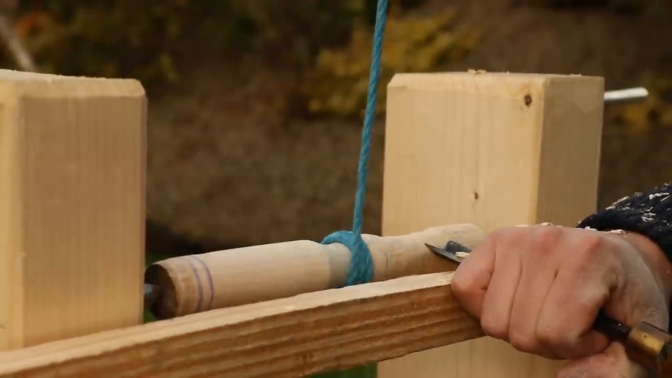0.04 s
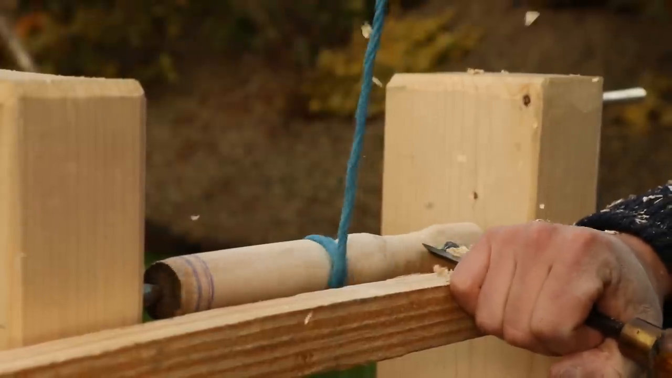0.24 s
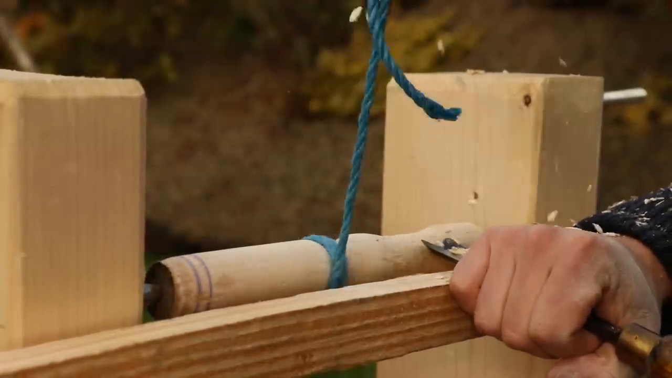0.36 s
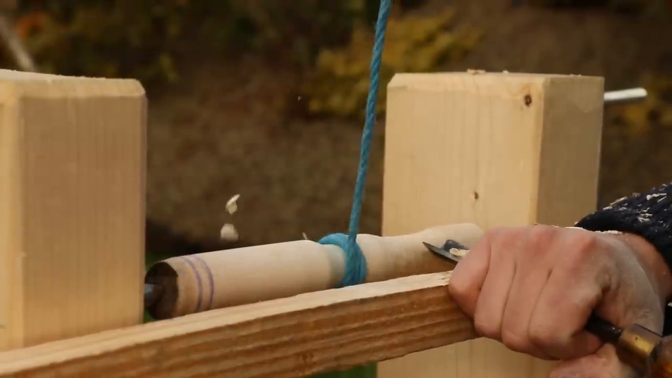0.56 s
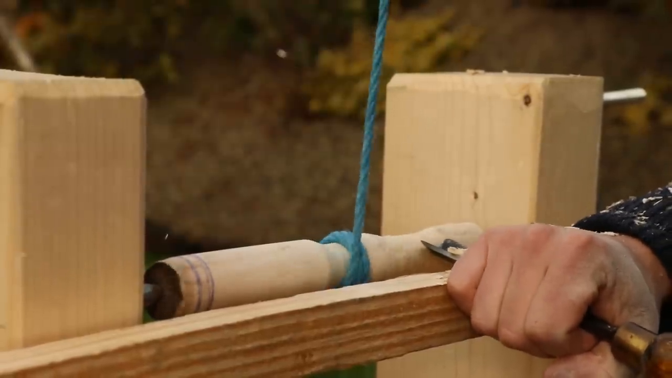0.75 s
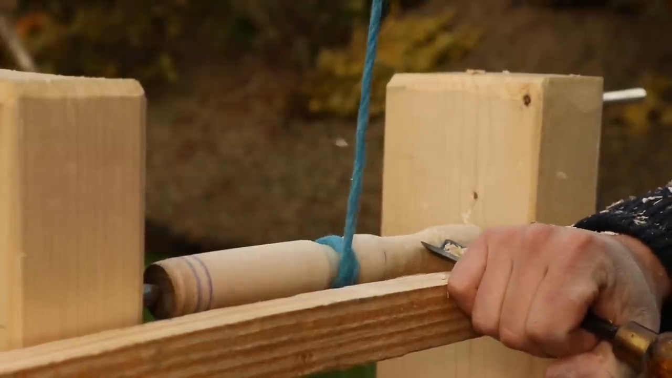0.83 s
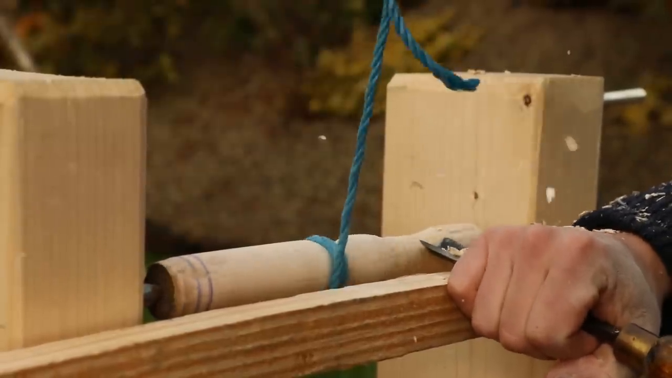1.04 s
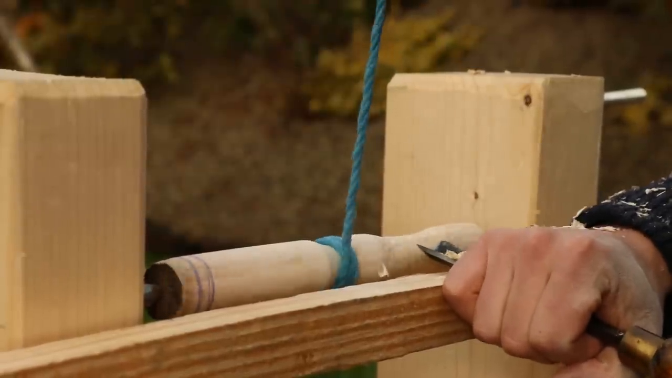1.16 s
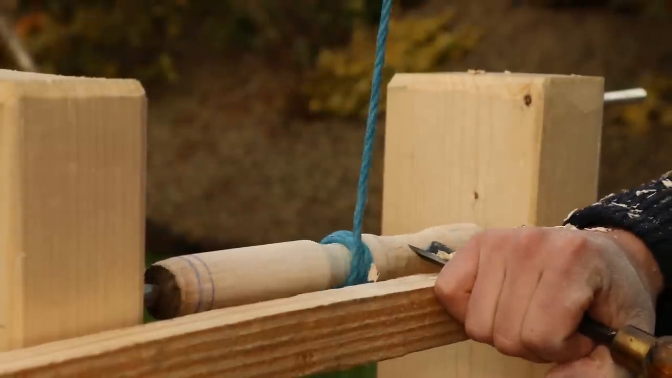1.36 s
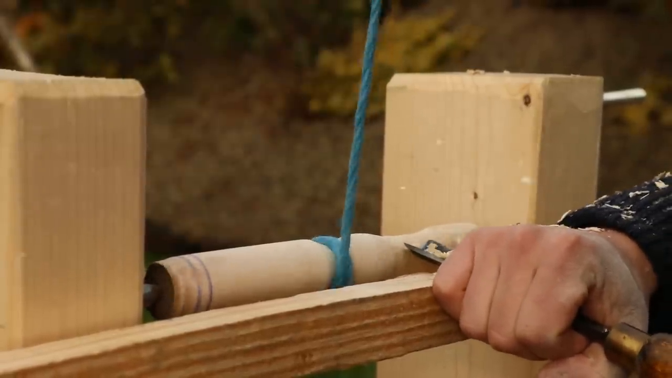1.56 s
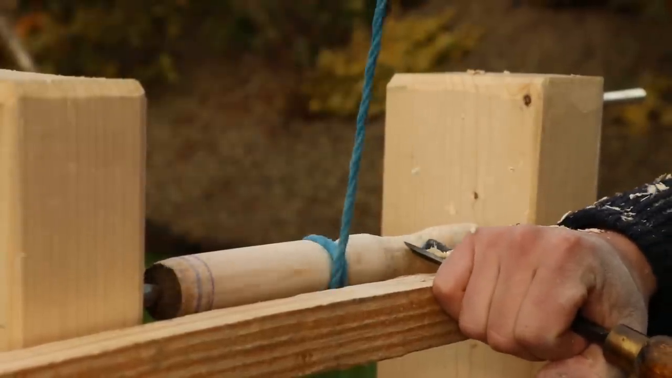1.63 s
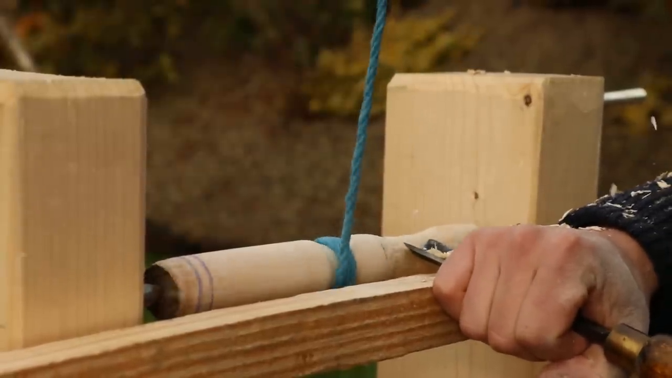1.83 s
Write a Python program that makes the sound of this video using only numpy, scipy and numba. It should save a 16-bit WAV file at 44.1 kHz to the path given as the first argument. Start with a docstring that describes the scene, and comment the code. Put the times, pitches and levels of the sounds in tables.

```python
"""Outdoors, close to a treadle lathe: a gouge cuts a wooden handle in three pushes.
On each push random snaps ring resonances of the wood and the steel; the edge catches, splinters ping,
and slips at lengthening gaps creak the work to a halt. Between pushes the cord spins the handle back:
rubbing grains and wavering notes make a hollow, juddering rub, with a faint squeak in the third spin.
Chips tick down as short bright bursts, and filtered noise is the quiet air around the lathe."""
import sys
import numpy as np
from scipy import signal
from scipy.fft import rfft, irfft, next_fast_len
from scipy.io import wavfile
from scipy.ndimage import uniform_filter1d
from numba import njit

SR = 44100
rng = np.random.default_rng(int(sys.argv[2]) if len(sys.argv) > 2 else 0)


def store_pcm(level_fs):
    """Save levels as 16-bit WAV."""
    pcm = np.round(np.clip(level_fs, -1, 1) * 32767).astype(np.int16)
    wavfile.write(sys.argv[1], SR, np.atleast_2d(pcm).T)


N = 85995
TIME = np.arange(N) / SR  # seconds


def from_db(db):
    """Decibels to gain."""
    return 10 ** (np.asarray(db) / 20)


def rms(x):
    """Root mean square."""
    return np.sqrt(np.mean(x ** 2) + 1e-20)


def level(tables, index):
    """Gain over time from one dB column of several gestures; silent between them."""
    total = np.zeros(N)
    for table in tables:
        rows = np.array(table)
        total += from_db(np.interp(TIME, rows[:, 0], rows[:, index], left=-150, right=-150))
    return total


def drift(rate):
    """Smooth random wandering with spread 1; a higher rate (per second) wanders faster."""
    r = np.exp(-2 * np.pi * rate / SR)
    # the first second is dropped, so that the filter has settled
    slow = signal.lfilter([1], [1, -2 * r, r * r], rng.standard_normal(N + SR))[SR:]
    return slow / rms(slow)


def flurry():
    """Densely packed pushes and pulls of even strength."""
    return rng.choice([-1., 1.], N)


def grains(per_s, spread_db, clump_db, clump_per_s):
    """Random clicks of uneven size that come in clumps; their slow level is even."""
    born = rng.random(N) < per_s / SR
    uneven_db = spread_db * np.minimum(rng.exponential(1, N), 4)
    sizes = from_db(uneven_db + clump_db * drift(clump_per_s))
    clicks = born * sizes * rng.choice([-1, 1], N)
    slow_power = np.abs(uniform_filter1d(clicks ** 2, size=420))  # over about 10 ms
    return clicks / np.sqrt(slow_power + 1e-6)


def burst(start, rise_s, fall_s):
    """A quick linear rise and an exponential fall."""
    age = TIME - start
    return np.clip(age / rise_s, 0, 1) * np.exp(-np.maximum(age - rise_s, 0) / fall_s)


def bursts(rows, rise_s, fall_s):
    """One burst for each row that begins with seconds and dB."""
    return sum(from_db(db) * burst(s, rise_s, fall_s) for s, db, *_ in rows)


def colour(x, points):
    """Causal (minimum-phase) filter whose spectrum runs through points of Hz and dB."""
    size = 2 * next_fast_len(N)
    hz, db = np.transpose(points)
    grid = np.maximum(np.arange(size // 2 + 1) * SR / size, 1)
    cepstrum = irfft(np.log(from_db(np.interp(np.log(grid), np.log(hz), db))))
    # folding the cepstrum forward makes the phase minimal
    cepstrum[1:size // 2] *= 2
    cepstrum[size // 2 + 1:] = 0
    return irfft(rfft(x, size) * np.exp(rfft(cepstrum)))[:N]


@njit
def moving_resonance(x, angle, r):
    """A resonance whose pitch (radians per sample) may move; gain 1 on top."""
    out = np.zeros(len(x))
    for i in range(2, len(x)):
        drive = (1 - r * r) / 2 * (x[i] - x[i - 2])
        out[i] = drive + 2 * r * np.cos(angle[i]) * out[i - 1] - r * r * out[i - 2] + 1e-18
    return out


def resonate(x, hz, width_hz):
    """One resonance at a steady or moving pitch."""
    angle = np.ones(N) * 2 * np.pi * hz / SR
    return moving_resonance(x, angle, np.exp(-np.pi * width_hz / SR))


# the contact point moves, favouring now one mode, now another
MODE_SWAY_DB, MODE_SWAY_PER_S = 4.5, 37
# the moving contact also detunes the modes, by a share of their pitch
WOOD_WANDER, STEEL_WANDER, WANDER_PER_S = .018, .014, 70


def body(force, modes, crack, wander=WOOD_WANDER, ringing=1):
    """A force sounds bare and rings modes of moving strength and pitch; ringing is the share reaching them."""
    sways = [from_db(MODE_SWAY_DB * np.clip(drift(MODE_SWAY_PER_S), -1, 1)) for _ in modes]
    shares = [flurry() * sway / rms(sway) for sway in sways]
    detunes = [1 + wander * drift(WANDER_PER_S) for _ in modes]

    def sound(x, into_modes):
        out = colour(x, crack)
        for (hz, width_hz, db), share, detune in zip(modes, shares, detunes):
            ring = resonate(x * share * into_modes, hz * detune, width_hz)
            out += from_db(db) * resonate(ring, hz, hz / 2)  # the broad second pass trims the skirts
        return out

    # scaled so that an even flurry ringing the body fully would come out at level 1
    return sound(force, ringing) / rms(sound(flurry(), 1))


# Quiet outdoor air around the microphone. Each row: frequency in Hz, relative level in dB.
AIR_COLOUR = [(25, -48), (90, -29.5), (180, -8.5), (520, -4.5), (1000, -24), (1600, -6), (3000, -20.5),
              (5000, -31), (11000, -33), (15500, -41)]
AIR_DB = -57  # overall level


def outdoor_air():
    """Steady noise, coloured like the open air."""
    air = colour(rng.standard_normal(N), AIR_COLOUR)
    return from_db(AIR_DB) * air / rms(air)


RUB_GRAINS_PER_S, RUB_SPREAD_DB, RUB_ROUGH_DB, RUB_ROUGH_PER_S, RUB_DB = 6500, 4.5, 4.5, 185, 5.5
JUDDER_DB, JUDDER_RISE_S, JUDDER_FALL_S = -12, 0.001, 0.0046
NOTE_DB, NOTE_RISE_S, NOTE_FALL_S = -5, 0.0035, 0.0084
NOTE_WAVER, NOTE_WAVER_PER_S = 0.0789, 136.3  # share of the pitch
# The handle rubbing, one list per backward spin. Each row: time in seconds, level in dB before RUB_DB.
RETURNS = [
    [(0.0, -43), (0.034, -46.5), (0.12, -47), (0.164, -50.5), (0.19, -82)],
    [(0.48, -50.5), (0.66, -44.5), (0.736, -47), (0.76, -43), (0.806, -50.5), (0.85, -68)],
    [(1.16, -55.5), (1.218, -45.5), (1.322, -44), (1.392, -47.5), (1.454, -46.5), (1.52, -64)],
    [(1.85, -56.5), (1.882, -53.5), (1.894, -44.5), (1.95, -45)],
]
# The spinning work judders against its centres with a short hollow note.
# Each row: start in seconds, level in dB before JUDDER_DB or NOTE_DB, mean pitch in Hz.
JUDDERS = [(0.024, -23.5, 598), (0.078, -20.5, 571), (0.499, -26, 589), (0.563, -24, 592),
           (0.584, -25.5, 579), (0.642, -22, 571), (0.669, -27, 514), (0.697, -25, 576),
           (0.749, -22.5, 692), (0.761, -22, 640), (1.178, -32.5, 694), (1.245, -26.5, 509),
           (1.284, -26, 589), (1.373, -27.5, 589), (1.442, -22.5, 530), (1.892, -42, 503)]
# Resonances of the work running free. Each row: mean pitch in Hz, width in Hz, relative level in dB.
SPINDLE = [(266, 59, -13), (511, 15, 2), (559.4, 63, 2), (680, 57, -9.5), (1017, 91, -17), (1318, 48, -7),
           (1617, 160, -8.5), (1990, 51, -9), (2490, 95, -13.5), (2730, 136, -18.5), (3670, 350, -24.5)]
# The bare rub and the bare scuff. Each row: frequency in Hz, relative level in dB.
RUB_COLOUR = [(40, -71), (150, -25.5), (400, -15.5), (900, -12), (2600, -34), (4800, -38.5), (7500, -35.5),
              (11000, -36), (15500, -50)]
JUDDER_COLOUR = [(100, -40), (400, -11), (1000, -7.5), (2600, -22), (4500, -49), (12000, -43)]


def backspin():
    """The handle runs backwards, rubbing on its centres and the cord; each judder is a scuff and a note."""
    rub = grains(RUB_GRAINS_PER_S, RUB_SPREAD_DB, RUB_ROUGH_DB, RUB_ROUGH_PER_S)
    rubbing = body(rub * from_db(RUB_DB) * level(RETURNS, index=1), SPINDLE, RUB_COLOUR)
    judder = from_db(JUDDER_DB) * bursts(JUDDERS, JUDDER_RISE_S, JUDDER_FALL_S) * flurry()
    scuffs = body(judder, SPINDLE, JUDDER_COLOUR)
    clock = np.cumsum(1 + NOTE_WAVER * drift(NOTE_WAVER_PER_S)) / SR  # its uneven pace makes the notes waver
    notes = np.zeros(N)
    for s, db, hz in JUDDERS:
        notes += from_db(db + NOTE_DB) * burst(s, NOTE_RISE_S, NOTE_FALL_S) * np.sin(2 * np.pi * hz * clock)
    return rubbing + scuffs + notes


THIN_HZ, THIN_WIDTH_HZ, RASP_HZ, RASP_WIDTH_HZ = 930, 470, 2900, 180
# A shallower cut loses its lower middle and gains a rasp.
# Each row: time in seconds, gain in dB at the centre of the lower middle, the same for the rasp.
THINNING = [(0.5, 0.5, 0), (1.0, -1, -1), (1.55, -6, 3.5)]


def thin(x):
    """As the cuts get lighter the lower middle fades, and at last the rasp comes forward."""
    s, middle_db, rasp_db = np.transpose(THINNING)
    middle = from_db(np.interp(TIME, s, middle_db))
    rasp = from_db(np.interp(TIME, s, rasp_db))
    middle_change = (middle - 1) * resonate(x, THIN_HZ, THIN_WIDTH_HZ)
    rasp_change = (rasp - 1) * resonate(x, RASP_HZ, RASP_WIDTH_HZ)
    return x + middle_change + rasp_change


BASS_DB, MID_DB, BASS_BELOW_HZ = -2, -2.5, 800
CATCH_DB, CATCH_IN_BASS_DB, CATCH_RISE_S, CATCH_FALL_S = -7, -9, 0.00033, 0.0014
# The edge catches and tears off a chip. Each row: start in seconds, level in dB before CATCH_DB.
CATCHES = [(0.2345, -6.5), (0.2627, -2.5), (0.274, 0.5), (0.2875, 0), (0.3041, 0.5), (0.312, 3), (0.327, 2),
           (0.349, -6.5), (0.383, -6.5), (0.859, -24.5), (0.904, -5), (0.921, -2.5), (0.935, 2.5),
           (0.951, -5.5), (0.9735, 1.5), (1.009, -8.5), (1.029, -10), (1.5912, -8), (1.5985, -5),
           (1.606, -15), (1.619, -8.5), (1.628, -9.5), (1.657, -14), (1.678, -9.5)]
# Modes of the handle and frame. Each row: mean pitch in Hz, width in Hz, relative level in dB.
WOOD = [(279.4, 33, -4), (395, 166, -7), (506, 37, 8.5), (611.4, 39, 6.5), (691, 40, 10), (831, 58, 3.5),
        (1013, 80, 3), (1212, 49, 1.5), (1359, 20, 3.5), (1515, 52, 6), (1668, 120, -2), (1964, 88, 1),
        (2483, 58, -2), (2770, 34, -10.5), (2947, 97, -5.5)]
# The bare contact of edge and wood. Each row: frequency in Hz, relative level in dB.
BASS_CRACK = [(30, -38), (85, -52), (130, -23), (210, -16.5), (300, -7), (650, 3), (900, -12.5),
              (1500, -50.5), (4000, -57)]
MID_CRACK = [(200, -70), (600, -17.5), (900, -6), (1700, -10.5), (2700, -2.5), (3300, -22.5), (6000, -41),
             (15000, -49.5)]


def ringing_wood(snaps, mid_level, bass_level):
    """Snapping fibres and catches of the edge ring the handle and frame."""
    catch = from_db(CATCH_DB) * bursts(CATCHES, CATCH_RISE_S, CATCH_FALL_S) * flurry()
    low_modes = [mode for mode in WOOD if mode[0] < BASS_BELOW_HZ]
    mid_modes = [mode for mode in WOOD if mode[0] >= BASS_BELOW_HZ]
    mid_force = snaps * from_db(MID_DB) * mid_level + catch
    bass_force = snaps * from_db(BASS_DB) * bass_level + from_db(CATCH_IN_BASS_DB) * catch
    return thin(body(bass_force, low_modes, BASS_CRACK) + body(mid_force, mid_modes, MID_CRACK))


TREBLE_DB = -1.5
FULL_BITE_DB = -36.5  # treble level, before TREBLE_DB, from which the gouge is buried and rings fully
SHAVING_PER_S, SHAVING_SPREAD_DB, SHAVING_SHARE = 4500, 1, 0.23  # share of the power on the steel
SHAVING_CLUMP_DB, SHAVING_CLUMP_PER_S = 11, 110
SPLINTER_DB, SPLINTER_RISE_S, SPLINTER_FALL_S = -4, 0.00047, 0.0016
# The shaving splinters and pings the gouge. Each row: start in seconds, level in dB before SPLINTER_DB.
SPLINTERS = [(0.2354, -21), (0.258, -21), (0.2788, -16), (0.294, -16.5), (0.3035, -15), (0.3485, -20),
             (0.9244, -16), (0.9345, -17), (0.949, -18.5), (0.972, -19.5), (0.9842, -19.5), (1.003, -21),
             (1.0279, -20), (1.5905, -21), (1.6196, -21.5), (1.628, -19), (1.645, -17.5), (1.6746, -28),
             (1.6846, -21), (1.6945, -15)]
# Modes of the gouge. Each row: mean pitch in Hz, width in Hz, relative level in dB.
STEEL = [(3650, 260, 6), (3890, 290, 0), (4545, 170, 1.5), (5570, 360, -4.5), (6960, 265, 4.5),
         (9240, 480, -9)]
# The bare contact on the steel. Each row: frequency in Hz, relative level in dB.
TREBLE_CRACK = [(800, -51), (2600, -1.5), (3800, -8.5), (5500, -15.5), (8000, -17.5), (11000, -13.5),
                (14000, -28), (16000, -36)]


def ringing_gouge(snaps, edge_level):
    """Snaps, the crackle of the shaving and splinters ring the steel, more fully in a deeper bite."""
    shaving = grains(SHAVING_PER_S, SHAVING_SPREAD_DB, SHAVING_CLUMP_DB, SHAVING_CLUMP_PER_S)
    on_steel = np.sqrt(1 - SHAVING_SHARE) * snaps + np.sqrt(SHAVING_SHARE) * shaving
    splinter = from_db(SPLINTER_DB) * bursts(SPLINTERS, SPLINTER_RISE_S, SPLINTER_FALL_S) * flurry()
    force = on_steel * from_db(TREBLE_DB) * edge_level + splinter
    bite = np.sqrt(np.minimum(edge_level / from_db(FULL_BITE_DB), 1))
    return body(force, STEEL, TREBLE_CRACK, wander=STEEL_WANDER, ringing=bite)


SNAPS_PER_S, SNAP_SPREAD_DB, TEAR_DB, TEAR_PER_S = 2600, 5, 3.5, 253
# The gouge pressed into the wood, one list per push. Each row: time in seconds, then the levels of the
# midrange, the treble and the bass in dB, before MID_DB, TREBLE_DB and BASS_DB.
PUSHES = [
    [(0.2, -54, -55, -66), (0.231, -41, -51.5, -38), (0.236, -21, -40.5, -43), (0.252, -27.5, -34.5, -22),
     (0.264, -18.5, -28.5, -24.5), (0.314, -14.5, -35, -16.5), (0.342, -18, -35.5, -34),
     (0.352, -18.5, -34, -26), (0.376, -32.5, -46, -23), (0.386, -23, -36, -27), (0.416, -28, -39, -19.5),
     (0.432, -44, -52, -70), (0.458, -33, -44.5, -27), (0.49, -64, -74, -98)],
    [(0.85, -60, -71, -51.5), (0.878, -44, -40.5, -36), (0.888, -25, -36.5, -33), (0.91, -34, -39.5, -23.5),
     (0.934, -15.5, -40.5, -22), (0.962, -37, -38, -17), (0.974, -21, -30.5, -29.5),
     (0.992, -26.5, -39.5, -24), (1.016, -22, -36, -28), (1.03, -28, -36, -24.5), (1.046, -41, -59, -29.5),
     (1.064, -35, -41.5, -36), (1.11, -42.5, -56, -35.5), (1.13, -47, -45.5, -51.5), (1.16, -61, -85, -59)],
    [(1.53, -64, -77, -58), (1.556, -44, -49, -48), (1.559, -30, -39, -26.5), (1.598, -24.5, -34, -37.5),
     (1.636, -33.5, -38, -27), (1.66, -27.5, -31.5, -26), (1.668, -36, -51, -31.5),
     (1.678, -21.5, -39, -26), (1.696, -33.5, -32.5, -32), (1.712, -35.5, -45, -36),
     (1.754, -39, -44.5, -35.5), (1.822, -46, -48.5, -53), (1.836, -70, -82, -57)],
]


def cut():
    """Fibres snap under the edge in clumps, and the same snaps drive the wood and the gouge."""
    snaps = grains(SNAPS_PER_S, SNAP_SPREAD_DB, TEAR_DB, TEAR_PER_S)
    wood = ringing_wood(snaps, mid_level=level(PUSHES, index=1), bass_level=level(PUSHES, index=3))
    return wood + ringing_gouge(snaps, edge_level=level(PUSHES, index=2))


CHIP_RISE_S, CHIP_FALL_S = 0.0005, .0008
# Chips landing. Each row: start in seconds, level in dB before the colouring.
CHIPS = [(0.445, -34), (0.593, -38.5), (0.609, -41.5), (0.786, -32.5), (0.857, -45), (1.064, -35.5),
         (1.218, -40.5), (1.432, -37), (1.437, -34)]
# Their bright tick. Each row: frequency in Hz, gain in dB.
CHIP_COLOUR = [(200, -25), (1500, 11), (4200, 2.5), (7000, 2), (11000, -1), (15500, -17)]


def chips():
    """Light, bright ticks of falling chips."""
    return colour(bursts(CHIPS, CHIP_RISE_S, CHIP_FALL_S) * flurry(), CHIP_COLOUR)


# the slips are counted back from the last one
LAST_GAP_S, GAP_SHRINK, SLIP_FADE_DB = 0.0068, 0.8, 1.6
# The work creaking to a halt. Each row: time of the last slip in seconds, its level in dB before colouring.
HALTS = [(0.46, -32.5), (1.130, -34), (1.8197, -32)]
# The creak of a slip. Each row: frequency in Hz, gain in dB.
SLIP_COLOUR = [(150, -28), (500, -5), (2200, 13), (3300, -2), (4300, 8.5), (5200, -17), (7200, 0),
               (9000, -6), (11200, 0.5), (15500, -20)]


def creaks(count=7, rise_s=.0001, fall_s=0.00079):
    """As the work stops it sticks and slips, ever slower and harder."""
    gaps_s = LAST_GAP_S * GAP_SHRINK ** np.arange(count - 1)
    back_s = np.concatenate([[0], np.cumsum(gaps_s)])
    slips = np.zeros(N)
    for last_s, db in HALTS:
        for k, back in enumerate(back_s):
            slips += from_db(db - SLIP_FADE_DB * k) * burst(last_s - back, rise_s, fall_s)
    return colour(slips * flurry(), SLIP_COLOUR)


SQUEAK_WAVER, SQUEAK_WAVER_PER_S = .008, 470  # share of the pitch
SQUEAK_ROUGH_DB, SQUEAK_ROUGH_PER_S = 2.5, 150
# Faint squeaks of the turning work. Each row: start in seconds, length in seconds,
# start pitch in Hz and end pitch in Hz before the waver, peak level in dB before the roughness.
SQUEAKS = [(1.218, .055, 4300, 4900, -53), (1.305, .042, 3450, 3900, -54)]


def squeaks():
    """Thin rising tones that waver in pitch and roughen in level."""
    out = np.zeros(N)
    for s, length, start_hz, end_hz, db in SQUEAKS:
        done = np.clip((TIME - s) / length, 0, 1)
        glide_hz = start_hz + (end_hz - start_hz) * done
        hz = glide_hz * (1 + SQUEAK_WAVER * drift(SQUEAK_WAVER_PER_S))
        gain = from_db(db + SQUEAK_ROUGH_DB * drift(SQUEAK_ROUGH_PER_S)) * np.sin(np.pi * done)
        out += gain * np.sin(2 * np.pi * np.cumsum(hz) / SR)
    return out


SCATTER_DB, SCATTER_T60_S = -8.5, 0.076


def scatter(x):
    """A short spray of reflections off the posts and the rest: decaying noise, starting after 2 ms."""
    decay = from_db(-60 * np.minimum(TIME / SCATTER_T60_S, 4))
    tail = rng.standard_normal(N) * decay * (TIME > .002)
    return signal.fftconvolve(x, tail / np.sqrt(np.sum(tail ** 2)))[:N]


def scene():
    """The lathe close by, with its reflections, over quiet outdoor air."""
    lathe = backspin() + cut() + chips() + creaks() + squeaks()
    reflections = from_db(SCATTER_DB) * scatter(lathe)
    return (lathe + reflections + outdoor_air())[None]


CUTOFF_HZ = 15700


def record(dry):
    """One microphone channel whose top is cut by a steep low-pass."""
    lowpass = signal.ellip(12, .1, 80, CUTOFF_HZ, fs=SR, output="sos")
    return signal.sosfilt(lowpass, dry)


dry = scene()
out = record(dry)
store_pcm(out)
```